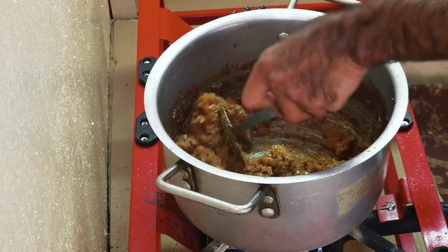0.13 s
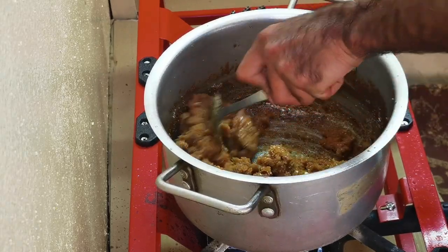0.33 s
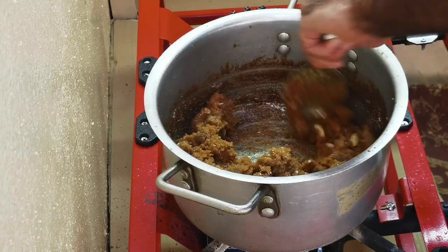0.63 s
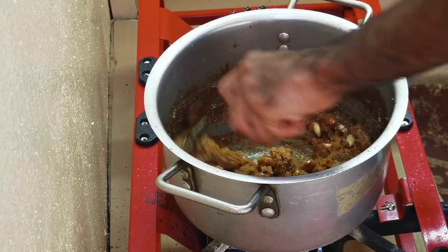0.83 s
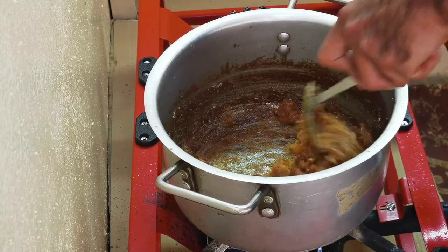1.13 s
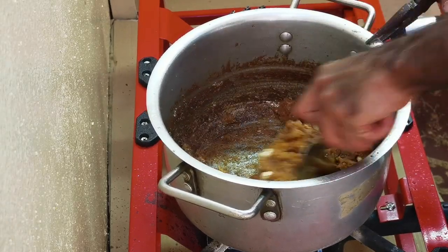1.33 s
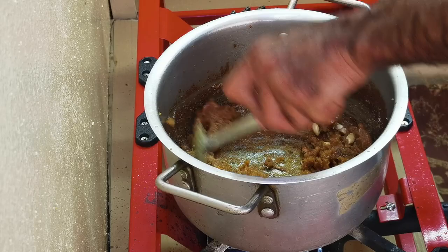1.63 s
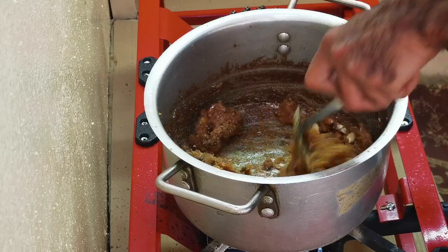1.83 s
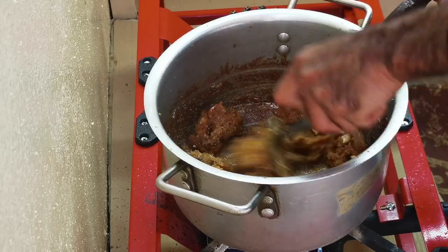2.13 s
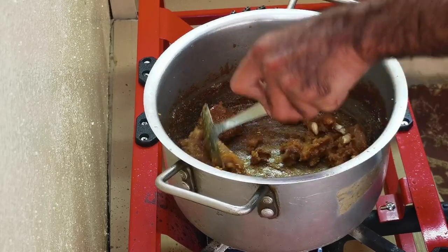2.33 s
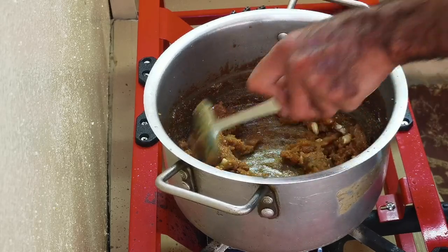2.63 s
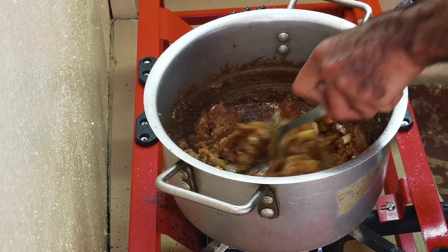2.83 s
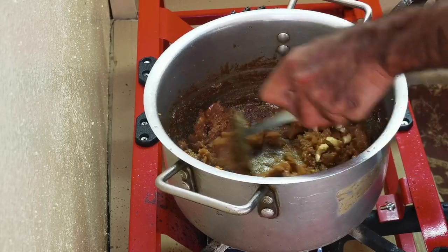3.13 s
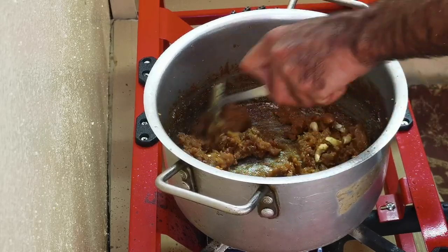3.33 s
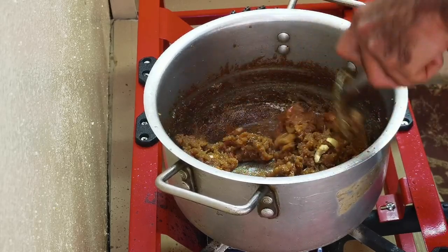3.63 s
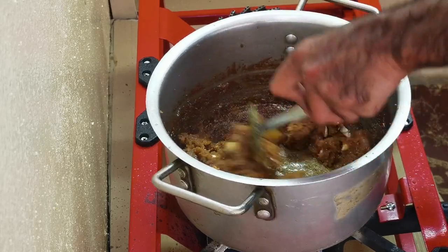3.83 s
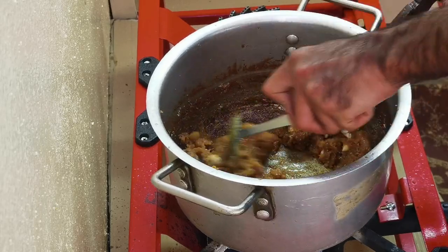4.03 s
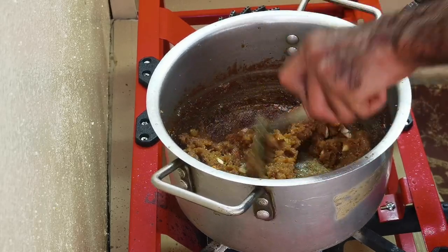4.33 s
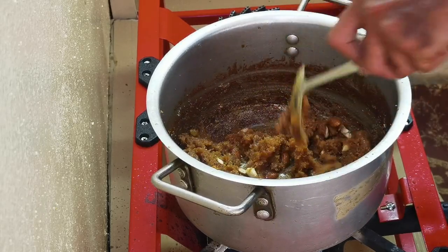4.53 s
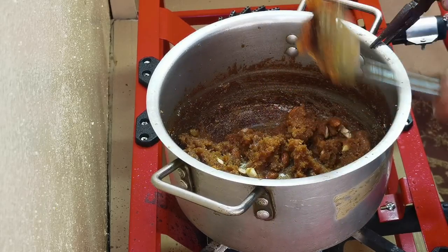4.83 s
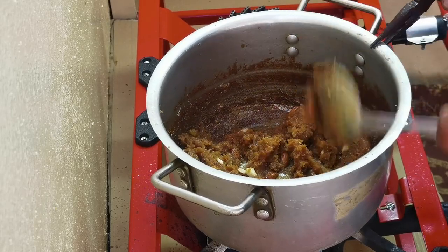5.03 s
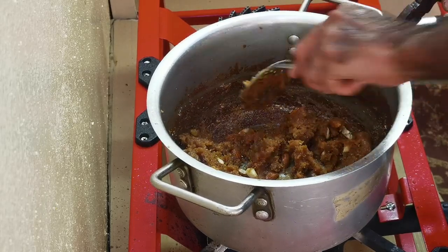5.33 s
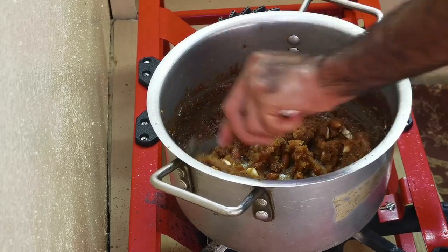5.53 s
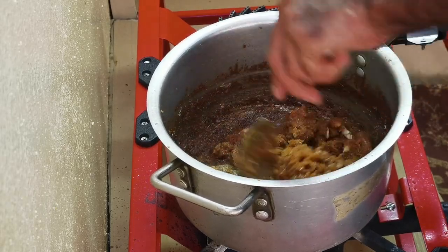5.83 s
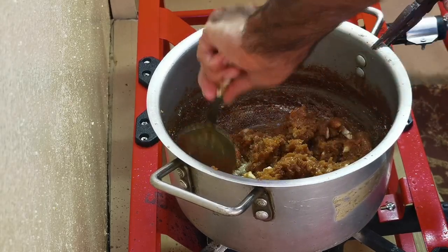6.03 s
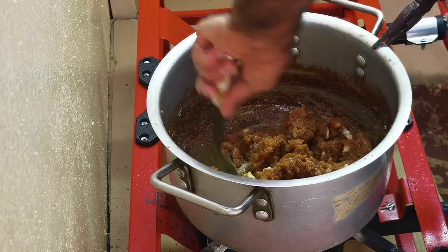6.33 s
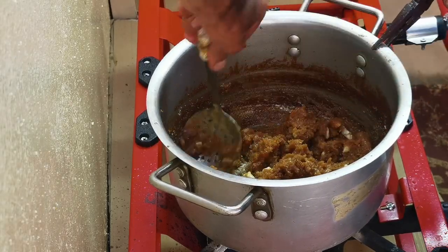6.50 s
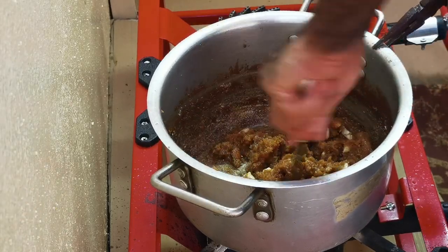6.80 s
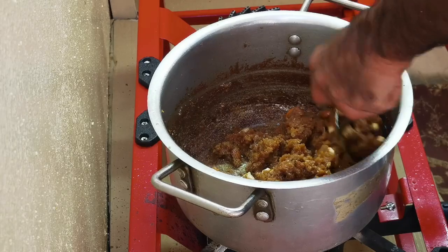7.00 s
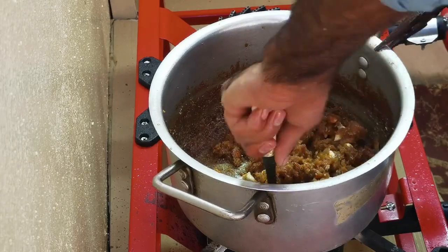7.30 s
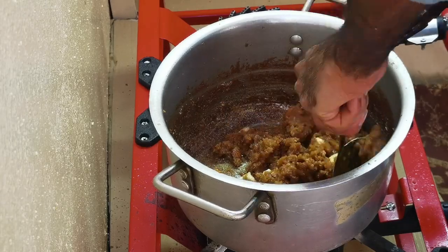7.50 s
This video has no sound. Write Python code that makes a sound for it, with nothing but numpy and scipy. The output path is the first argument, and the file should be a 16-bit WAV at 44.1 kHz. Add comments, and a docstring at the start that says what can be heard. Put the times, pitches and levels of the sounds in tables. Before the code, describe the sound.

A metal spoon knocks and scrapes through thick semolina paste in an aluminium pot, with soft fat sizzle and a low stove hum.

```python
"""In a kitchen, at a gas stove: a metal spoon stirs thick fried semolina in an aluminium pot.
The spoon knocks and drags on the pot, whose damped modes ring; it clangs on the bare rim, twice strongly.
The stove frame hums under each jolt; fat sizzles and spits in the paste, and the spoon's edge hisses on metal.
Two microphones hear the bass almost alike and the treble less so; the wall echoes stay faint behind the pot.
Knocks and modes are struck resonators, the sizzle and the flame are noise shaped in bands."""
import sys
import numpy as np
from scipy import signal
from scipy.io import wavfile

SR = 44100
rng = np.random.default_rng(int(sys.argv[2]) if len(sys.argv) > 2 else 0)


def gain_from_decibels(decibels):
    """Convert decibel values to linear amplitude factors."""
    exponent = np.asarray(decibels, float) / 20
    return 10 ** exponent


def file_out(sig):
    """Save sig as 16-bit WAV at sys.argv[1]."""
    # one column per channel
    cols = np.atleast_2d(sig).T
    # limit, then scale
    lim = np.clip(cols, -1, 1)
    pcm = np.round(lim * 32767).astype(np.int16)
    wavfile.write(sys.argv[1], SR, pcm)


N = 337806

# Levels in the tables are relative; each source adds its own offset. rise_s and fall_s span 20 dB.
# Low roar of the gas ring and the kitchen: pitch_hz, level_db (per hertz)
FLAME_SPECTRUM = [(15, -30), (25, 10.5), (102, 11.5), (266, -49), (519, 6), (671, -93), (994, -1.5),
                  (1140, -50), (1500, -56), (3300, -120)]
# Body of the frying hiss: pitch_hz, level_db (per hertz)
SIZZLE_LOW = [(650, -41), (1100, -14), (1430, -3), (1940, 2.5), (2620, -2), (3450, -0.5), (5420, 2),
              (7550, -1), (10500, -46), (22000, -120)]
# Top octave of the frying hiss: pitch_hz, level_db (per hertz)
SIZZLE_TOP = [(5590, -47), (9500, 7), (11000, 16), (12400, 7), (13900, 15), (15000, 19.5), (15900, 8)]
# Fat sizzling in the paste: time_s, level_db
FRYING = [(0, -43), (1.5, -40.5), (2.2, -42), (3.1, -45.5), (4.0, -43.5), (4.6, -46), (5.0, -46),
          (5.5, -52), (7.66, -48)]
# The spoon's edge scrapes over metal: peak_s, rise_s, fall_s, hiss_db, top_octave_db
SCRAPES = [(.22, 0.67, 0.048, -35.5, -35), (.6, 0.64, 0.23, -38, -35), (3.19, 0.19, 0.17, -38.5, -42),
           (3.54, 0.17, 0.13, -37.5, -56), (5.04, 0.036, 0.77, -37, -54), (5.199, 0.054, 0.023, -37, -25),
           (5.24, 0.037, 0.48, -37.5, -60), (5.8, 0.36, 0.11, -40, -56), (6.26, 0.25, 0.3, -43, -39.5),
           (6.48, 0.033, 0.31, -37, -39), (6.56, 0.14, 0.075, -39.5, -28), (6.82, 0.3, 0.64, -38.5, -41),
           (7.54, 0.17, 0.55, -41, -41)]
# Likeness of the two microphones: pitch_hz, likeness (0 to 1)
LIKENESS = [(30, .99), (300, .998), (700, .98), (1500, .8), (3000, .68), (6000, .64), (9000, .33),
            (14000, .66)]
# Balance of the two microphones: pitch_hz, left_over_right_db
LEFT_DB = [(60, -.4), (250, .5), (700, 1), (1400, 2.3), (3000, 1.5), (6000, 1.1), (10000, -.3)]
# The pot jolts the stove frame: peak_s, hum_db
JOLTS = [(.11, -29), (0.179, -29.5), (.64, -40), (1.3, -35), (1.45, -34), (1.621, -31), (2.211, -29.5),
         (2.32, -34.5), (2.62, -37), (3.9, -28), (3.96, -30.5), (4.5, -43), (5.06, -32), (5.2, -31),
         (5.28, -29), (5.598, -43), (5.8, -41), (6.12, -39), (6.3, -40), (6.82, -43.5), (7.05, -39),
         (7.202, -35), (7.439, -32.5)]
# Duller modes of the stove frame: pitch_hz, level_db, t60_s
STOVE_MODES = [(74, -1.5, 0.087), (90, 10.5, 0.061), (145, 4, 0.06), (179, 10, 0.065)]
# Ring of the spoon under metal contact: pitch_hz, level_db, t60_s
SPOON_MODES = [(3090, -13.5, 0.018), (3373, -11, 0.038), (4100, -1.5, 0.0039), (5303, -6, 0.021),
               (5850, -2, 0.0065), (6320, -1, 0.006), (8780, -15.5, 0.0051), (12740, -6, 0.0018)]
# The bare rim, free of paste, rings long: pitch_hz, level_db, t60_s
RIM_MODES = [(1037, -15.5, 0.23), (1220, -30, 0.47), (1420, -24, .4), (1548, -22, 0.19), (1700, -33, 0.15),
             (2950, -36, 0.83), (3050, -33, 0.75), (3480, -33, 0.47), (3580, -31, 0.93), (4140, -39, 0.91),
             (4650, -25, 0.61), (5350, -35, .35), (5670, -36, 0.44), (6200, -31.5, 0.65), (6530, -40, 0.54)]
# Thuds between these pitches land on the bare rim: low_hz, high_hz
RIM_HZ = (900, 1100)
# Modes of the pot, damped by the paste: pitch_hz, level_db, t60_s
POT_MODES = [(289, -15.5, 0.12), (307.9, -5.5, 0.22), (365.2, -3.5, 0.14), (404.7, 2.5, 0.097),
             (442, 3.5, 0.03), (503, 1.5, 0.098), (536, 2.5, 0.083), (608.7, -16, 0.21), (712, -12, 0.16),
             (783, -13, 0.26), (826.5, -9.5, 0.12), (971, -2, 0.039), (1010, 2, 0.079),
             (1147, -12.5, 0.094), (1248, -10.5, 0.16), (1380, -3.5, 0.028), (1468, -6.5, 0.11),
             (1528, -9.5, 0.078), (1714, -16, 0.17), (1984, -6, 0.027), (2444, -11, 0.041)]
# Pushes through the paste: peak_s, rise_s, fall_s, bottom_db, wall_db
PUSHES = [(.16, 0.093, 0.11, -20.5, -28), (.62, 0.24, 0.18, -36, -41), (1.07, 0.38, 0.14, -37.5, -39.5),
          (1.46, 0.18, 0.44, -33.5, -37), (1.781, 0.052, 0.19, -36.5, -35.5), (2.3, 0.18, 0.16, -29, -40.5),
          (2.62, 0.11, 0.17, -24.5, -43), (3.98, 0.17, 0.24, -33.5, -40), (5.06, 0.075, 0.53, -41.5, -29.5),
          (5.22, 0.27, 1, -48, -45), (5.778, 0.075, 0.11, -29, -31), (6.098, 0.031, 0.063, -25.5, -28),
          (6.3, 0.22, 0.15, -37, -57), (6.48, 0.12, 0.18, -37.5, -38), (6.9, 0.24, 0.5, -37.5, -35.5),
          (7.62, 0.25, 0.096, -32.5, -30)]
# The spoon's edge rubs one part of the pot: peak_s, rise_s, fall_s, level_db, favoured_mode_hz
RUBS = [(.44, 0.14, 0.1, -23.5, 2220), (.94, 0.12, 0.18, -26, 2330), (2.5, 0.6, 0.21, -34, 1880),
        (2.85, 0.032, 0.11, -36, 1200), (5.747, 0.033, 0.024, -22.5, 712), (6.289, 0.096, 0.031, -35, 1200),
        (6.47, 0.037, 0.13, -38.5, 1010), (6.811, 0.036, 0.037, -15, 902), (7.51, 0.048, 0.066, -43, 1010),
        (7.599, 0.059, 0.028, -29.5, 1010)]
# Knocks and scuffs: start_s, peak_db, thud_pitch_hz, wall_db (over the peak), contact_ms (before any stretch)
KNOCKS = [(0.08, -17.5, 337, 2, 10), (0.099, 0.5, 571, -5.5, 8.4), (0.131, 2, 510, -13, 5.2),
          (0.152, -7, 534, -7, 4.4), (0.179, -3, 527, -13, 2.4), (0.204, -14.5, 567, -20, 3.3),
          (0.528, -13.5, 1360, -20, 2.7), (0.621, -21, 403, 1, 1), (1.087, -15, 488, -27, 6.9),
          (1.263, -6.5, 567, -23, 6.8), (1.424, -6, 446, -5.5, 3.6), (1.608, 0, 525, -7, 9.3),
          (1.645, -6, 523, -7.5, 7.7), (1.745, -6.5, 364, -4, 5.9), (2.204, -1, 418, -4.5, 4.1),
          (2.225, -3, 534, -21, 4.2), (2.283, 3.5, 523, -19, 4.4), (2.576, 4.5, 433, -10, 1.2),
          (2.619, -20, 395, -25, 8.7), (3.207, -17.5, 430, -0.5, 22), (3.828, -15, 495, -35, 28),
          (3.880, -1.5, 517, -3, 7.1), (3.927, 0, 460, -30, 4.4), (3.951, 2.5, 458, -15.5, 4.3),
          (3.994, -11, 503, -20, 5.6), (4.489, -15.5, 355, -8.5, 7.4), (5.034, -9, 1010, 0, 4.1),
          (5.16, -3.5, 522, -15, 3.3), (5.191, -9, 1010, 0.5, 4), (5.234, -8.5, 504, -6.5, 20),
          (5.265, 1.5, 529, -18, 5), (5.288, -8, 500, -1, 18.6), (5.384, -17.5, 494, 1, 12),
          (5.730, -11.5, 520, -2.5, 16), (5.754, -12.5, 640, -4.5, 2.6), (5.772, 1, 502, -27, 6.7),
          (5.795, -14.5, 455, -10, 9.3), (5.809, -15, 391, -10, 12), (5.868, -14, 452, -25, 3),
          (6.079, -5, 515, -4.5, 8.9), (6.284, -10.5, 608.4, 1.5, 17), (6.458, -25.5, 1010, 0, 6.5),
          (6.537, -18, 1350, -11, 2), (6.548, -29, 1440, 1, 3.1), (6.614, -20.5, 1530, -6, 2),
          (6.724, -13.5, 1360, -20, 3), (6.786, -16, 1350, -17, 3.4), (6.812, -0.5, 800, -12, 12.4),
          (6.834, -15, 570, -4, 4), (7.011, -9.5, 532, -11, 4.5), (7.063, -16.5, 502, 2.5, 16),
          (7.17, -6.5, 536, -7.5, 4.2), (7.313, -38, 1010, 1, 3.8), (7.354, -25, 367, 2, 6.9),
          (7.409, -4, 547, -5.5, 6.5), (7.432, -5.5, 515, -33, 7.7), (7.483, -22, 533, 5, 11),
          (7.569, -23.5, 1010, -4, 5.3)]

# Livelier frying is brighter: its top octave follows the frying level, both in dB
TOP_PER_FRYING_DB, TOP_DB = 1.5, 23.5
HUM_HZ, REST_HUM_DB = 104.3, -60
JOLT_RISE_S, JOLT_FALL_S, RUMBLE_FALL_S = 0.046, 0.33, 0.18   # over 20 dB
# The spoon chatters more as a knock reaches the wall, and far more on the bare rim
CHATTER_PER_WALL_DB, CHATTER_DB, RIM_GAIN_DB = 2, -12.5, 17.5
RIM_SPLIT_PER_KHZ = 0.005   # spacing of close partners, as a share of the mode's pitch
RIM_BODY_HZ = 315           # rim knocks also rock the low body
WALL_TIME_RATIO = 0.86      # the wall swells and fades in less time than the bottom
REST_BOTTOM_DB, REST_WALL_DB = -52, -54   # between pushes
RUB_DB_PER_OCTAVE = 27.5
CURVE_STEP = 40             # samples between points of a slow curve


def rms_one(x):
    """Scales to unit rms."""
    return x / np.sqrt(np.mean(x ** 2) + 1e-20)


def in_time(rows):
    """One value per sample for each column of a curve."""
    s, *columns = np.transpose(rows)
    return [np.interp(np.arange(N) / SR, s, column) for column in columns]


def at_hz(points, hz):
    """Reads a spectrum on a log-frequency axis."""
    points = np.array(points)
    return np.interp(np.log(hz), np.log(points[:, 0]), points[:, 1])


def drift(rate_hz):
    """Slow random wander of unit spread: noise through two equal low-pass poles."""
    r = np.exp(-2 * np.pi * rate_hz * CURVE_STEP / SR)
    noise = rng.standard_normal(N // CURVE_STEP + 2002)
    slow = signal.lfilter([1], [1, -2 * r, r * r], noise)[2000:]   # the filter has settled
    return np.interp(np.arange(N) / CURVE_STEP, np.arange(len(slow)), rms_one(slow))


def swells(s, rise_s, fall_s, peak_db, rest_db):
    """Level in dB of events that rise and fall evenly in dB, summed in power over a resting level."""
    t = np.arange(0, N, CURVE_STEP)[:, None] / SR - s
    down_db = 20 * np.where(t < 0, -t / rise_s, t / fall_s)
    power = np.sum(gain_from_decibels(2 * (peak_db - down_db)), axis=1)
    power = np.interp(np.arange(N) / CURVE_STEP, np.arange(len(t)), power)
    return 10 * np.log10(power + gain_from_decibels(2 * rest_db))


def ring(force, hz, t60):
    """A damped resonator: a unit click sets a sine of starting height 1 ringing."""
    r, w = gain_from_decibels(-60 / (t60 * SR)), 2 * np.pi * hz / SR
    return signal.lfilter([0, np.sin(w)], [1, -2 * r * np.cos(w), r * r], force + 1e-18)


def steady_gain(t60):
    """Gain at which steady noise of unit rms rings a mode to about unit rms, whatever its decay."""
    return np.sqrt(4 * np.log(1000) / (t60 * SR))


def grains(per_s, spread_db):
    """Random clicks with a long tail of sizes; rms 1."""
    sizes = gain_from_decibels(spread_db * np.minimum(rng.exponential(1, N), 5)) * rng.choice([-1, 1], N)
    return rms_one(sizes * (rng.random(N) < per_s / SR))


def balance(hz):
    """Gains of the left and right microphones at one pitch."""
    return gain_from_decibels(at_hz(LEFT_DB, hz) * np.array([[.5], [-.5]]))


def banded(pairs, spectrum, patchy_db):
    """Bands of about a third octave, from two mid-side pairs in turn, each band flickering alone; rms 1."""
    low_end, high_end = spectrum[0][0], spectrum[-1][0]
    edges = np.geomspace(low_end, high_end, int(3 * np.log2(high_end / low_end)) + 3)
    out = 0
    for k, (low, high) in enumerate(zip(edges, edges[1:])):
        band = signal.butter(2, [low, high], "band", fs=SR, output="sos")
        mid, side = signal.sosfilt(band, pairs[k % 2])
        hz = np.sqrt(low * high)
        alike = np.clip(at_hz(LIKENESS, hz), 0, 1)
        both = np.sqrt(1 + alike) * mid + np.sqrt(1 - alike) * side * [[1], [-1]]
        level = gain_from_decibels(at_hz(spectrum, hz) + patchy_db * drift(20.3))
        out = out + level * balance(hz) * both
    return rms_one(out)


def placed(sound, hz, lag):
    """A mode reaches the two microphones with its own balance and a small unlike part, lag samples late."""
    alike = at_hz(LIKENESS, hz)
    alike = np.clip(alike + 0.29 * (1 - alike), 0, 1)
    side = np.sqrt((1 - alike) / (1 + alike)) * np.roll(sound, lag)
    return balance(hz) * (sound + side * [[1], [-1]])


def laid(rows, s, n):
    """Adds one short row of samples at each time."""
    places = np.clip((s * SR).astype(int)[:, None] + n, 0, N)
    return np.bincount(places.ravel(), rows.ravel(), N + 1)[:N]


def on_rim(thud_hz):
    """True for knocks that land on the bare rim."""
    return (thud_hz > RIM_HZ[0]) & (thud_hz < RIM_HZ[1])


def contacts(strength, stretch, clean, skid):
    """Force of all knocks: a skid in, one firm blow, then chatter dying over the contact; unit energy each."""
    s, contact_ms = np.array(KNOCKS)[:, 0], np.array(KNOCKS)[:, 4:]
    contact = stretch * np.clip(contact_ms, 1, 40) * SR / 1000   # samples
    n = np.arange(-1500, 5000)
    skid_size = np.minimum(skid * contact / (0.0039 * SR), 1)    # long contacts skid more
    skid_in = skid_size * np.exp(-np.abs(n) / (.5 * contact))
    shape = np.where(n < 0, skid_in, np.exp(-np.abs(n) / contact))
    chatter = shape * rng.standard_normal(shape.shape) / np.sqrt(np.sum(shape ** 2, axis=1, keepdims=True))
    firm = clean * np.exp(-(contact / (.011 * SR)) ** 2)         # share of energy in the firm blow
    blows = strength[:, None] * (np.sqrt(1 - firm) * chatter + np.sqrt(firm) * (n == 0))
    return laid(blows, s, n)


def flame():
    """Low uneven roar of the gas ring and the kitchen: noise in flickering bands."""
    roar = banded(rng.standard_normal((2, 2, N)), FLAME_SPECTRUM, patchy_db=2)
    no_subsonics = signal.butter(2, 36, "high", fs=SR, output="sos")
    return gain_from_decibels(-51) * signal.sosfilt(no_subsonics, roar)


def kitchen(x, t60):
    """A short tail of wall echoes, unlike on each side: decaying noise, softened in the treble."""
    t = np.arange(int(.4 * SR)) / SR
    tail = rng.standard_normal((2, len(t))) * gain_from_decibels(-60 * t / t60) * (t > .006)
    tail = signal.lfilter([.5], [1, -.5], tail) / np.sqrt(np.sum(tail ** 2, axis=1, keepdims=True))
    return signal.fftconvolve(x[None], tail, axes=1)[:, :N]


def hissing():
    """Level of the hiss and of its top octave, dB: scrapes over the frying."""
    s, rise, fall, hiss_db, top_db = np.transpose(SCRAPES)
    frying_db, = in_time(FRYING)
    frying_top_db = TOP_PER_FRYING_DB * frying_db + TOP_DB
    return swells(s, rise, fall, hiss_db, frying_db), swells(s, rise, fall, top_db, frying_top_db)


def sizzle():
    """Dense fine bubbles make a hiss that flutters as a whole; larger ones spit out of it as lone ticks."""
    level_db, top_db = hissing()
    spits = gain_from_decibels(-11) * np.array([[grains(25, 4), grains(25, 4)] for pair in range(2)])
    flutter = gain_from_decibels(.7 * drift(8) + .7 * drift(40))
    fizz = rng.standard_normal((2, 2, N)) * flutter + spits
    body = gain_from_decibels(level_db - 1.94) * banded(fizz, SIZZLE_LOW, patchy_db=3.5)
    top = gain_from_decibels(top_db - 11.0) * banded(fizz, SIZZLE_TOP, patchy_db=4.0)
    return body + top


def stove():
    """One frame mode hums as a slightly wavering sine; duller modes rumble in strong shaking and die sooner."""
    s, jolt_db = np.transpose(JOLTS)
    hum_db = swells(s, JOLT_RISE_S, JOLT_FALL_S, jolt_db, REST_HUM_DB)
    hum_level = np.sqrt(2) * gain_from_decibels(hum_db + 1.5 * drift(8.4))
    hum = hum_level * np.sin(2 * np.pi * np.cumsum(HUM_HZ + .5 * drift(3.8)) / SR)
    rumble_db = swells(s, JOLT_RISE_S, RUMBLE_FALL_S, 1.474 * jolt_db + 5.0, REST_HUM_DB - 15)
    rumble_db = rumble_db + 1.36 * drift(37.0)
    rumble = np.zeros(N)
    for hz, db, t60 in STOVE_MODES:
        shaking = gain_from_decibels(rumble_db + db) * rng.standard_normal(N) * steady_gain(t60)
        rumble += ring(shaking, hz, t60)
    band = np.vstack([signal.butter(2, 260, fs=SR, output="sos"),
                      signal.butter(4, 50, "high", fs=SR, output="sos")])
    frame = hum + signal.sosfilt(band, rumble)
    # bass reaches both microphones almost alike
    return frame + gain_from_decibels(-27.0) * np.roll(frame, int(SR / HUM_HZ / 4)) * [[1], [-1]]


def spoon():
    """Metal on metal: the edge skids in, its chatter rings the spoon's bright modes, and scraping sings them."""
    _, peak_db, thud_hz, wall_db, _ = np.transpose(KNOCKS)
    rim_hit = on_rim(thud_hz)
    chatter_db = CHATTER_PER_WALL_DB * wall_db + CHATTER_DB + RIM_GAIN_DB * rim_hit
    skid = np.where(rim_hit, 1, .3)[:, None]
    hiss_db = hissing()[0]
    crack = contacts(gain_from_decibels(peak_db + wall_db - 14.0), stretch=0.33, clean=0.46, skid=0)   # the first touch
    crack_band = signal.butter(2, [2000, 7000], "band", fs=SR, output="sos")
    out = placed(signal.sosfilt(crack_band, crack), 4000, lag=23)
    for hz, db, t60 in SPOON_MODES:
        chatter = contacts(gain_from_decibels(peak_db + chatter_db + db - 2.0), stretch=2.86, clean=0.016, skid=skid)
        grit_level = gain_from_decibels(1.43 * hiss_db + db + 5.5 + 3.8 * drift(11.0))   # grit grows faster than the hiss
        rubbing = grit_level * grains(1400, 2.66) * steady_gain(t60)
        out += placed(ring(chatter + rubbing, hz, t60), hz, int(SR / hz * 20.25))
    return out


def rim():
    """Rim knocks strike clusters of close partners, unlike in strength and decay, so the ring shimmers."""
    _, peak_db, thud_hz, wall_db, _ = np.transpose(KNOCKS)
    out = np.zeros((2, N))
    for hz, db, t60 in RIM_MODES:
        strength = on_rim(thud_hz) * gain_from_decibels(peak_db + wall_db + db - 3.5)
        blow = contacts(strength, stretch=.4, clean=.95, skid=.1)
        offsets = np.linspace(-2.4, 2.4, 9) + rng.uniform(-.3, .3, size=9)
        decays = t60 * rng.uniform(0.5, 1.2, size=9)
        sizes = rng.choice([-1, -.5, 1], size=9)
        rings = np.zeros(N)
        for offset, decay, size in zip(offsets, decays, sizes):
            partner_hz = hz * (1 + RIM_SPLIT_PER_KHZ * hz / 1000 * offset)
            rings += size * ring(blow, partner_hz, decay)
        wobble = gain_from_decibels(2.2 * drift(20))   # the pot wobbles on its stand
        out += placed(wobble * rings, hz, int(SR / hz * 9.9))
    return out


def thuds():
    """The spot under the spoon gives a short tone of its own that sags as paste loads it."""
    s, peak_db, thud_hz, _, contact_ms = np.transpose(KNOCKS)[:, :, None]
    n = np.arange(4000)
    t = n / SR
    hold = 0.003 + 0.0012 * np.clip(contact_ms, 1, 40)
    hold = hold * (500 / thud_hz) ** 0.67   # seconds; higher thuds die sooner
    phase = 2 * np.pi * thud_hz * (t - 0.02 * t ** 2 / hold)
    envelope = (1 - np.exp(-t / (0.12 * hold))) * np.exp(-t / hold)
    return laid(gain_from_decibels(peak_db - 9.5) * envelope * np.sin(phase), s[:, 0], n)


def dragging():
    """Force of the pushes on the bottom and on the wall, dB."""
    s, rise, fall, bottom_db, wall_db = np.transpose(PUSHES)
    bottom = swells(s, rise, fall, bottom_db, REST_BOTTOM_DB)
    wall = swells(s, WALL_TIME_RATIO * rise, WALL_TIME_RATIO * fall, wall_db, REST_WALL_DB)
    return bottom, wall


def rubbing_db(hz):
    """Force of the rubs on the mode at hz, dB: weaker with distance from the favoured pitch."""
    s, rise, fall, rub_db, rub_hz = np.transpose(RUBS)
    return swells(s, rise, fall, rub_db - RUB_DB_PER_OCTAVE * np.abs(np.log2(hz / rub_hz)), -120)


def pot():
    """Knocks ring bottom and wall modes, most near the thud's pitch; dragging grit feeds the same modes."""
    _, peak_db, thud_hz, wall_hit_db, _ = np.transpose(KNOCKS)
    rim_hit = on_rim(thud_hz)
    bottom_db, wall_db = dragging()
    judder = gain_from_decibels(2.98 * drift(19.7))   # the spoon sticks and slips
    out = placed(thuds(), 240, lag=35)
    for k, (hz, db, t60) in enumerate(POT_MODES):
        wall = hz > 870   # higher modes belong to the wall, lower ones to the bottom
        struck_hz = thud_hz if wall else np.where(rim_hit, RIM_BODY_HZ, thud_hz)
        near_db = -11 * np.minimum(np.abs(np.log2(hz / struck_hz)) / 0.61, 2.4)
        if wall:
            hit_db = wall_hit_db + 0.64 * near_db
            drag_db = wall_db - 9.5
        else:
            hit_db = near_db - 9.5 + 6.7 * rim_hit
            drag_db = bottom_db - 11.0
        blows = (-1) ** k * contacts(gain_from_decibels(peak_db + db + hit_db - 3), stretch=1, clean=.93, skid=.3)
        grit_level = gain_from_decibels(drag_db + db) + gain_from_decibels(rubbing_db(hz) + 1.37 * db - 4.5)
        grit = grit_level * judder * grains(600, 2.85) * steady_gain(t60)
        out += placed(ring(blows + grit, hz, t60), hz, int(SR / hz / 4))
    # a small pot radiates no deep bass
    return signal.sosfilt(signal.butter(3, 230, "high", fs=SR, output="sos"), out)


def scene():
    """Flame, frying and stove behind the spoon, rim and pot with their faint wall echoes."""
    struck = pot() + rim() + spoon()
    bright = signal.sosfilt(signal.butter(2, 600, "high", fs=SR, output="sos"), struck.mean(axis=0))
    echoes = gain_from_decibels(-20.5) * kitchen(bright, t60=0.65)
    return flame() + sizzle() + stove() + echoes + struck


def roll_off(x):
    """The treble ends steeply here."""
    return signal.sosfilt(signal.butter(12, 16970, fs=SR, output="sos"), x)


def record(dry):
    """Peaks are gently rounded, then the top is cut steeply above 15.8 kHz."""
    rounded = 1.435 * np.tanh(dry / 1.238)
    cut = signal.ellip(10, .5, 60, 15800, fs=SR, output="sos")
    mix = signal.sosfilt(cut, rounded)
    return roll_off(mix)


dry = scene()
out = record(dry)
file_out(out)
```